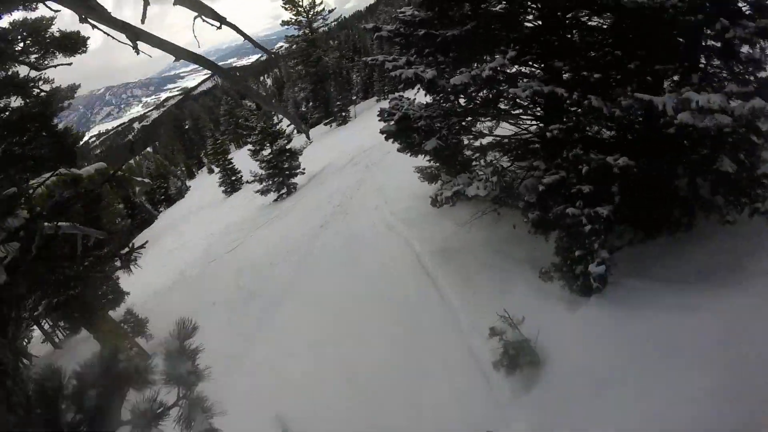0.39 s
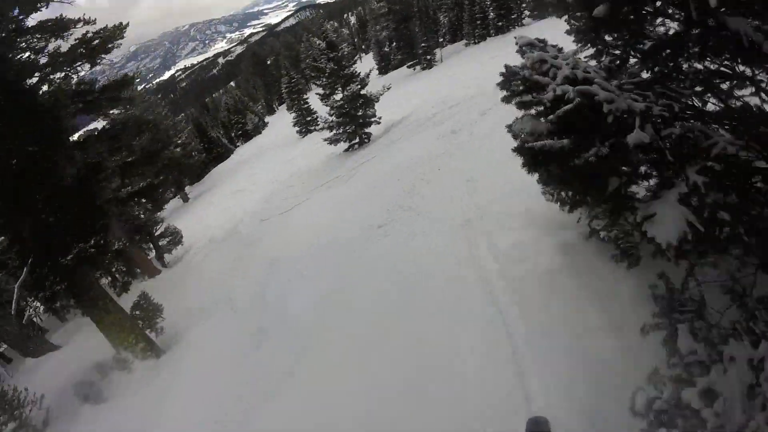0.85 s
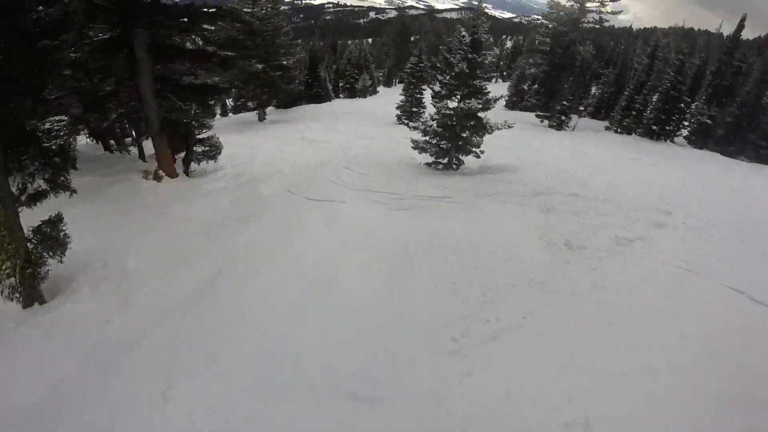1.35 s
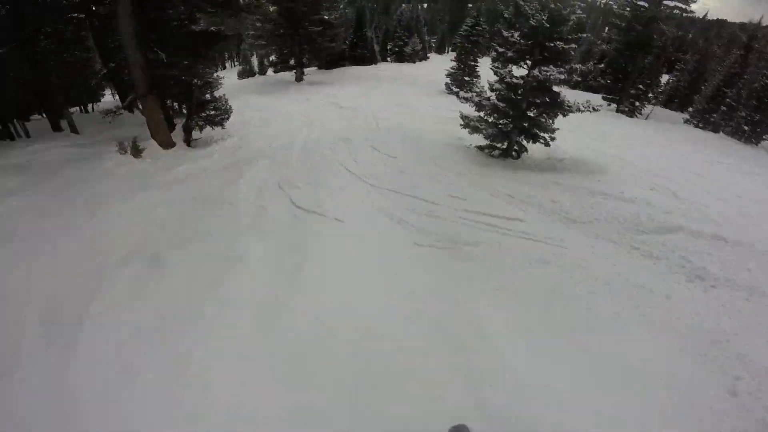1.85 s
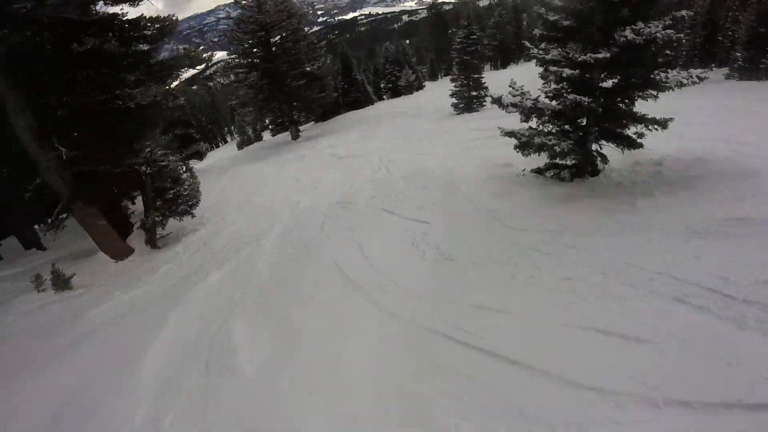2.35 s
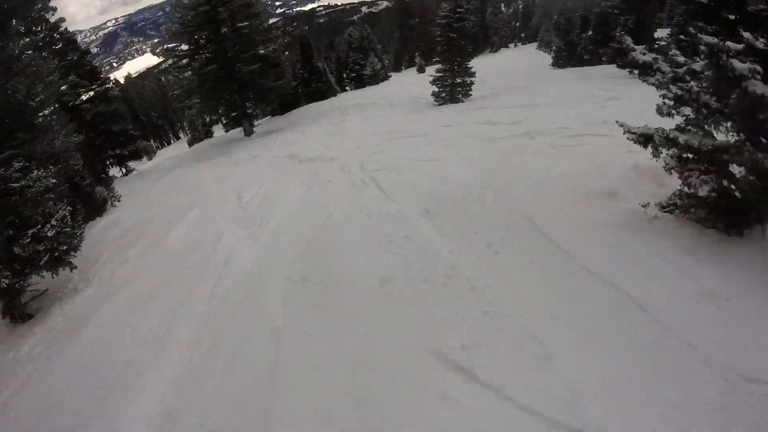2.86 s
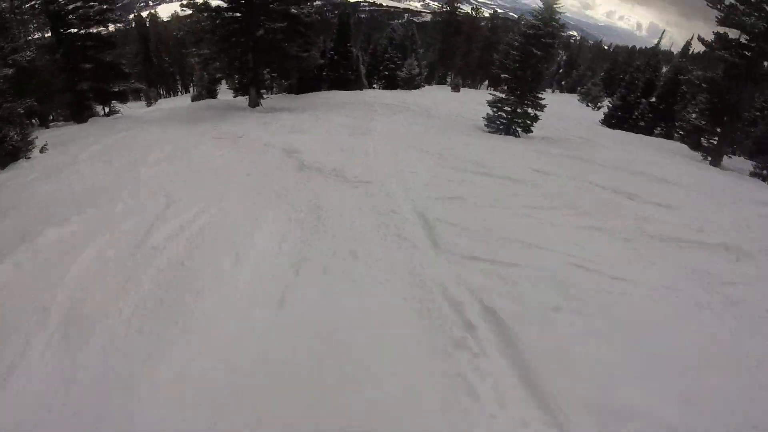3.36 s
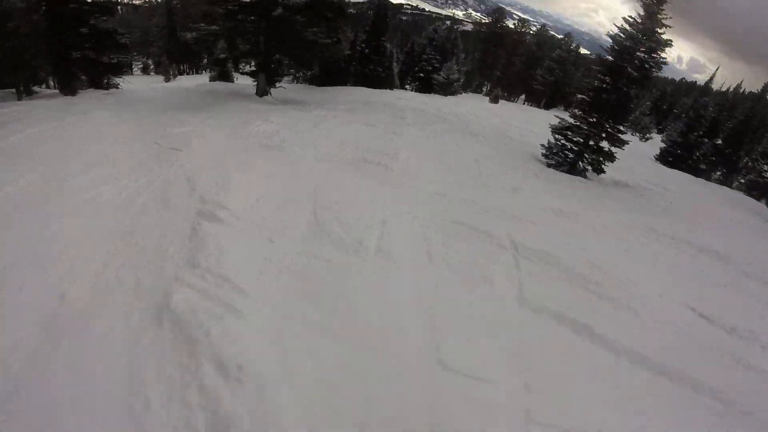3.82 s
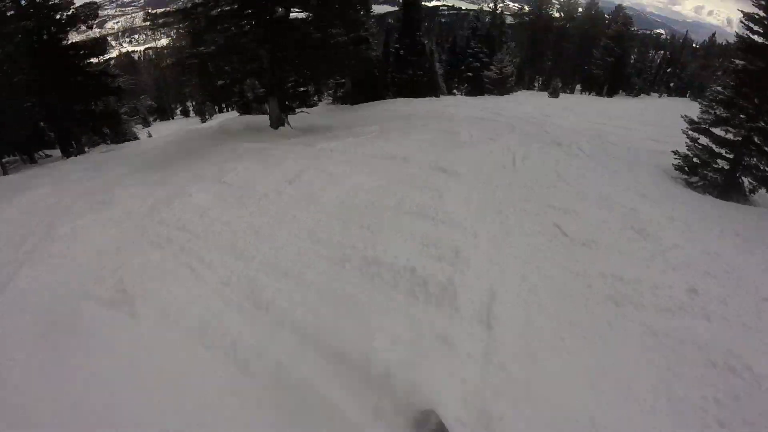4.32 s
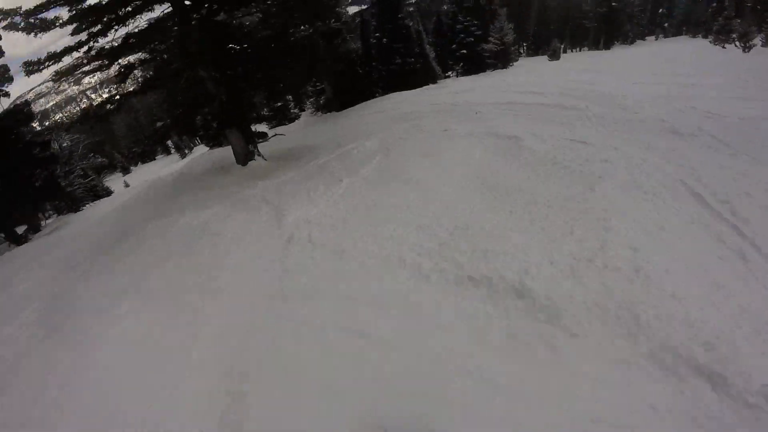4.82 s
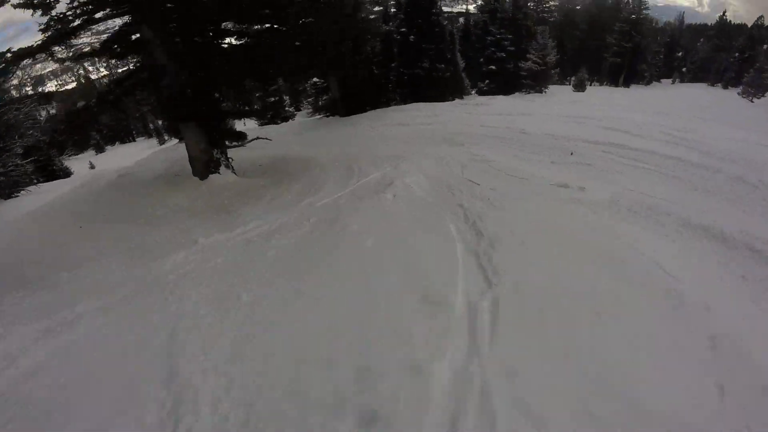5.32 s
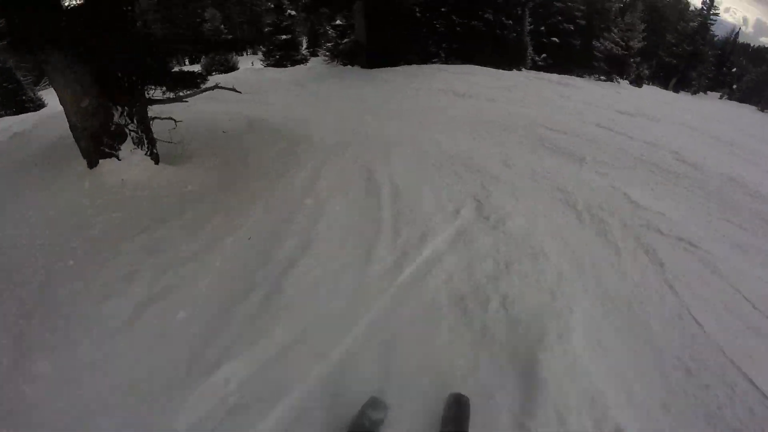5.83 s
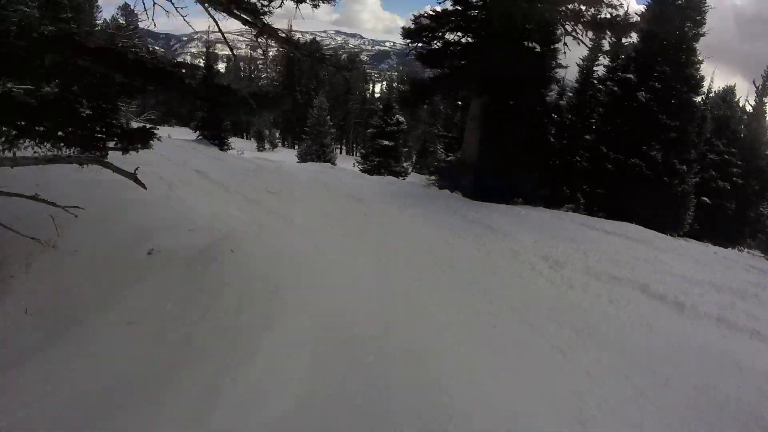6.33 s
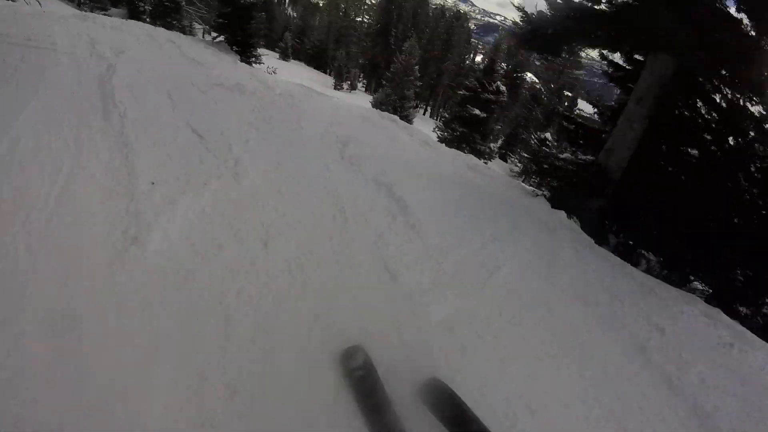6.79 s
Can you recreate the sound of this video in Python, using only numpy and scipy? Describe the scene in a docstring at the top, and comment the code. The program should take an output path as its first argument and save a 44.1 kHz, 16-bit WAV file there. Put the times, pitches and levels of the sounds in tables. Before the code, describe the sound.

Close, boxy sound inside a camera housing on an open snowy slope: first nearly quiet, soft brushing snow, then a rattle and rising coarse hiss as the skis carve and skid. Turns come as rough surges of scraping and fine spray over low wind buffeting. Dry plastic ticks become frequent, a low bump jolts the microphone midway, and the loudest bangs and rattles crowd the last half second.

```python
"""Snow hisses under the skis of a skier carving down a slope with a camera in a plastic housing.
The hiss is gritty noise ringing through the resonances of the housing. Wind throbs as noise through a
low resonance and rustles as bands of noise. Knocks are short fading tones, the loose mount ticks
as tiny clicks that ring the housing, and bumps in the slope jolt the camera as single slow swings.
"""
import sys
import numpy as np
from scipy import signal
from scipy.io import wavfile
from scipy.ndimage import uniform_filter1d

SR = 44100
rng = np.random.default_rng(int(sys.argv[2]) if len(sys.argv) > 2 else 0)


def waveform_to_disk(signal):
    """Save audio, clipped to [-1, 1], as 16-bit WAV at the path in sys.argv[1]."""
    frames = np.transpose(np.atleast_2d(signal))
    scaled = np.clip(frames, -1, 1) * 32767
    samples = np.round(scaled).astype(np.int16)
    wavfile.write(sys.argv[1], SR, samples)


def ratio_of_db(decibels):
    """Turn decibels (scalar or array-like) into linear amplitude factors; 0 dB maps to 1."""
    return 10 ** (np.asarray(decibels, float) / 20)


N = 305613      # length in samples


def rms_one(x):
    """Scale to rms 1."""
    return x / np.sqrt(np.mean(x ** 2) + 1e-20)


def in_time(rows):
    """Join the rows of a table by straight lines: each column becomes one value per sample."""
    s, *columns = np.transpose(rows)
    return [np.interp(np.arange(N) / SR, s, column) for column in columns]


def drift(rate_hz):
    """Slow random wandering of spread 1: noise at every 20th sample, smoothed by two low-passes."""
    r = np.exp(-2 * np.pi * rate_hz * 20 / SR)
    noise = rng.standard_normal(N // 20 + 3002)
    slow = signal.lfilter([1], [1, -2 * r, r * r], noise)[3000:]      # skip the settling
    return np.interp(np.arange(N) / 20, np.arange(len(slow)), rms_one(slow))


def ring(x, hz, width_hz):
    """A resonance: a unit click sets a fading sine ringing from height 1; a wider one fades sooner."""
    r, w = np.exp(-np.pi * width_hz / SR), 2 * np.pi * hz / SR
    return signal.lfilter([0, np.sin(w)], [1, -2 * r * np.cos(w), r * r], x + 1e-18)


def cut(x, hz, kind, order=2):
    """Butterworth filter."""
    return signal.sosfilt(signal.butter(order, hz, kind, fs=SR, output="sos"), x)


# gusts pressing on the housing: start_s, level_db
GUSTS = [(0.0, -42.5), (0.75, -45), (1.05, -40), (1.74, -38), (1.916, -22.5), (2.14, -50), (2.28, -33.5),
         (3.2, -36.5), (3.6, -29.5), (3.9, -35), (4.25, -31), (4.505, -15.5), (4.9, -27.5), (5.32, -36),
         (5.887, -23), (6.21, -36.5), (6.62, -17.5), (6.93, -18.5)]


def wind_throb():
    """Gusts swing the membrane near its lowest resonance, heard as a deep throb."""
    (level_db,) = in_time(GUSTS)
    swing = ring(rng.standard_normal(N), 27.3, 16)
    throb = cut(cut(swing, 19.4, "high"), 43.4, "low", order=6)
    # halve the chance swings in level (in dB), so that the gusts lead
    power = uniform_filter1d(throb ** 2, SR // 8)
    return ratio_of_db(level_db) * rms_one(throb / power ** 0.25)


# strength of the small eddies around each pitch, relative: pitch_hz, level_db (per Hz)
EDDIES = [(70, 1), (130, -3), (250, -7.5), (450, -13)]


def wind_rustle(buffet_db):
    """Small eddies buffet the housing: bands of noise that swell partly together, partly alone."""
    lumps, rustle = drift(4.0), 0
    for hz, level_db in EDDIES:
        band = cut(rng.standard_normal(N), [hz / 1.72, hz * 1.59], "band")
        rustle = rustle + band * ratio_of_db(level_db + 0.24 * lumps + 2.5 * drift(13.0))
    return ratio_of_db(buffet_db) * rms_one(rustle)


# how the skis ride: start_s, load_db (weight on the edges, as hiss level),
# skid_db (sideways slide), bite_db (grip of the edge, as brightness)
RIDE = [(0.0, -67.5, 3.2, -5), (1.6, -59.5, -2.1, -4), (1.69, -49, 0, -8), (1.836, -41, 4.5, -3.5),
        (2.01, -56, 3.5, -2), (2.2, -47, -10, -5), (2.28, -39.5, -3, 2), (2.509, -35, -3, 6),
        (2.549, -39, -4, -4), (3.2, -32, 1.5, 4), (3.63, -31, 5.5, -2), (3.69, -37, 5, -3),
        (3.9, -38.5, 3.5, -.6), (3.97, -34, -0.5, 1.1), (4.3, -32, 7, 0.5), (4.62, -37, 6.5, -1.5),
        (5.07, -32, -3, -1.5), (5.43, -29, 3.5, 3), (5.6, -33, 2.3, -1), (5.82, -33, 6, -2.5),
        (6.0, -40.5, 6.5, -3), (6.2, -36, -4, .1), (6.24, -33.5, 6, 2.5), (6.575, -29.5, 9.5, -1.7),
        (6.635, -25, 13, -0.5), (6.72, -36.5, 8, -4), (6.93, -41, 10, 5)]
# brief scuffs over rough patches: peak_s, half_length_s (nominal), rise_db (added to the load)
ROUGH_PATCHES = [(0.287, .08, 6.5), (0.567, 0.11, 13.5), (0.912, .04, 2), (1.046, 0.01, 7),
                 (1.224, 0.023, 2), (1.43, 0.034, 2), (1.693, 0.0096, 4), (1.798, 0.015, 3.5),
                 (4.24, 0.022, 2), (5.717, 0.15, 4.5)]


def skis():
    """Load and skid set the level of the hiss, scrape, spray and buffeting; scuffs leave the air alone."""
    load_db, skid_db, bite_db = in_time(RIDE)
    clock = np.arange(N) / SR
    swing_db = load_db + 40      # load above a reference of -40 dB
    buffet_db = -50 + 0.49 * swing_db + 0.24 * skid_db
    scuff_db = 0
    for s, half_s, rise_db in ROUGH_PATCHES:
        # full rise up to 0.48 of the half length, gone at 1.3 of it
        scuff_db = scuff_db + rise_db * np.interp(np.abs(clock - s) / half_s, [0.48, 1.3], [1, 0])
    hiss_db = load_db + scuff_db
    skid_db = skid_db + 0.14 * scuff_db
    swing_db = swing_db + scuff_db
    scrape_db = -51.5 + 0.55 * swing_db + 0.67 * skid_db
    spray_db = -62 + 0.82 * swing_db + 0.89 * skid_db + 0.42 * scuff_db
    mist_db = 0.2 * skid_db      # the finest spray grows with the skid
    return hiss_db, scrape_db, spray_db, bite_db, mist_db, buffet_db


# resonances (modes) of the housing, also used by ticks(): pitch_hz, width_hz,
# hiss_db (relative gain for snow), tick_db (gain for ticks)
MODES = [(391, 47, -5.5, -21.5), (589, 23.2, -2.5, -47), (1050, 135, -13.5, -18), (1430, 225, -1.5, -7),
         (1928, 244, 0, -3), (2238, 180, -1.5, -3.5), (2618, 460, -2.5, -3.5), (3170, 600, -35, 6),
         (4018, 376, -8, 1.5), (5635, 185, 10.5, -7), (6220, 360, 9, -8.5), (7900, 870, -6, 6),
         (9320, 1200, -7, -0.5), (11600, 2500, -48.5, -11)]


def snow(hiss_db, scrape_db, spray_db, bite_db, mist_db):
    """Crushed crystals make gritty noise that fills each resonance, all swelling together over ruts."""
    ruts_db, grit_db = 1.0 * drift(10.3), 1.54 * drift(133.0)
    parts = np.zeros((3, N))      # scrape, hiss, spray
    # pellets of ice strike the housing, about 14 a second
    ice = (rng.random(N) < 14 / SR) * rng.exponential(12.0, N)
    for hz, width_hz, level_db, _ in MODES:
        part = np.searchsorted([1700, 4600], hz)
        # lumps break under the edge, about 40 a second, heard in the scrape only
        crunch = (rng.random(N) < 40 / SR) * 20.0 * (part == 0)
        grains = rng.standard_normal(N) + crunch + ice * (hz > 7200)
        grains = grains * ratio_of_db(ruts_db + grit_db + 0.28 * drift(9.9))
        if hz < 700:      # a biting edge makes the lowest modes hum
            grains = grains * ratio_of_db(0.9 * bite_db)
        if hz > 4600:      # bite favours the modes below 7000 Hz, skid the finest spray
            tilt = np.clip(np.log2(7000 / hz) * 4, -1, 1)
            grains = grains * ratio_of_db(bite_db * tilt + mist_db * (hz > 7200))
        elif 1700 < hz < 4000:      # a clean carve favours the upper modes of the hiss
            tilt = np.clip(np.log2(hz / 2250) * 4, -0.8, 0.8)
            grains = grains * ratio_of_db(bite_db * tilt)
        parts[part] += ratio_of_db(level_db) * ring(grains, hz, width_hz) * width_hz / np.sqrt(SR)
    scrape, hiss, spray = (rms_one(p) for p in parts)
    scrape = cut(scrape, 3270, "low")
    hiss = cut(cut(hiss, 3434, "low", order=4), 1894, "high", order=3)
    spray = cut(cut(spray, 5600, "high", order=4), 10500, "low", order=3)
    return ratio_of_db(scrape_db) * scrape + ratio_of_db(hiss_db) * hiss + ratio_of_db(spray_db) * spray


# dull knocks on the housing, and a few crunches of snow under the skis (the rows at 950-1380 Hz): start_s,
# level_db, pitch_hz
BLOWS = [(0.855, -47, 420), (1.565, -46, 584), (1.944, -22.5, 121), (1.964, -25, 328), (1.885, -40, 590),
         (1.719, -42, 416), (2.255, -39, 577), (3.341, -31, 1050), (4.433, -25, 160), (4.44, -16.5, 310),
         (4.526, -16.5, 182), (5.617, -32.5, 950), (5.83, -26, 1380), (5.574, -31, 121), (5.75, -24.5, 134),
         (5.988, -33, 328), (6.545, -16, 119), (6.691, -6, 295), (6.694, -8, 123), (6.665, -7, 94),
         (6.741, -14, 92.5), (6.81, -15, 261), (6.875, -19, 112), (6.9151, -5, 288)]


def knocks():
    """A soft blow, or a crunch of snow, sets one mode of the housing ringing: a short sine with a quick fade."""
    out, t = np.zeros(N), np.arange(SR // 5) / SR
    for s, level_db, hz in BLOWS:
        t60 = 0.047 * (300 / hz) ** 0.043      # seconds to fade by 60 dB; higher modes slightly sooner
        onset = 1 - np.exp(-t / 0.000067)
        note = np.sin(2 * np.pi * hz * t) * ratio_of_db(level_db - 60 * t / t60) * onset
        i = round(s * SR)
        out[i:i + len(t)] -= note[:N - i]
    return out


# ticks of the loose mount: start_s, level_db, hardness (0-1)
MOUNT_TICKS = [(1.689, -39.5, 0.37), (1.967, -25, 0.42), (2.0394, -32.5, 0.53), (2.049, -25, 0.41),
               (2.087, -41, 0.45), (2.193, -32.5, 0.46), (2.1973, -30, 0.39), (2.2414, -34.5, 0.27),
               (3.488, -30.5, 0.37), (3.585, -33, 0.2), (3.627, -27.5, 0.34), (3.656, -34, 0.25),
               (4.0054, -20.5, 0.84), (4.011, -30, 0.38), (4.0811, -29.5, .25), (4.1467, -18.5, 0.6),
               (4.176, -29, 0.8), (4.4404, -16, 0.57), (4.5034, -25, 0.56), (4.5182, -31, 0.14),
               (4.5472, -27, 0.9), (4.584, -27, 0.77), (4.7025, -18, .48), (4.9162, -22, 0.47),
               (5.001, -33, 0.27), (5.0516, -25, 0.46), (5.1608, -24, 1), (5.372, -25.5, .95),
               (5.4411, -24, 0.43), (5.6576, -25.5, 0.26), (5.745, -18.5, .7), (5.907, -23.5, 0.66),
               (6.038, -29.5, 0.42), (6.044, -22.5, 0.62), (6.0763, -33, 0.12), (6.0818, -31, 0.36),
               (6.1128, -27.5, 0.59), (6.1614, -26.5, .4), (6.2348, -27.5, 0.34), (6.34, -26, 0.64),
               (6.553, -23.5, 0.65), (6.6466, -22.5, 0.5), (6.681, -22.5, 0.7), (6.73, -19, 0.64),
               (6.7438, -24, 1), (6.7562, -24, 0.66), (6.7989, -25, .9), (6.851, -26, 0.3),
               (6.8832, -20.5, 1), (6.9147, -25, 0.13)]
# padded slaps that reach mainly the lower modes: start_s, level_db
PADDED_SLAPS = [(1.8059, -25), (4.529, -17), (4.734, -22.5), (6.6, -26), (6.6632, -9), (6.692, -17.5),
                (6.749, -19), (6.872, -16.5)]
# thin snaps, a dull body with a bright edge and a hollow middle: start_s, level_db
THIN_SNAPS = [(1.753, -38.5), (1.8824, -33.5), (2.2547, -29.5), (2.706, -31), (3.15, -31.5), (3.432, -32),
              (4.512, -36), (4.665, -30.5), (4.6851, -28.5), (5.2462, -27.5), (5.567, -35), (5.721, -30),
              (5.877, -27), (6.3071, -28.5), (6.398, -28), (6.702, -26), (6.777, -35), (6.789, -36)]


def contacts():
    """Start of each contact and its strength in the dull, hard and top modes."""
    rows = []
    for s, db, hardness in MOUNT_TICKS:      # a harder tick has less of the dull modes
        rows.append((s, db - 30.5 * (hardness - 0.26), db, db - 14))
    for s, db in PADDED_SLAPS:
        rows.append((s, db, db - 59, db - 59))
    for s, db in THIN_SNAPS:
        rows.append((s, db, db - 18, db - 10.5))
    return np.array(rows)


def ticks():
    """Each contact is five quick bounces that strike every resonance with a strength of its own."""
    rows, out = contacts(), np.zeros(N)
    chance = rng.random((len(rows), 5))
    # bounces follow 0.4 to 2 ms apart; the first comes within 0.2 ms of the start
    lag_s = np.cumsum(0.0004 + 0.0016 * chance, axis=1) - 0.0004 - 0.0014 * chance[:, :1]
    at = np.minimum(((rows[:, :1] + lag_s) * SR).astype(int), N - 1)
    fade_db = -1500.0 * lag_s
    spread = rng.standard_normal((len(rows), len(MODES), 5))
    dull_db, hard_db, top_db = rows[:, 1:].T[:, :, None]
    for k, (hz, width_hz, _, level_db) in enumerate(MODES):
        hard = np.clip((hz - 2000) / 3500, 0, 1)      # 0 for a dull mode, 1 for a hard one
        band_db = top_db if hz > 7200 else dull_db + hard * (hard_db - dull_db)
        strength = ratio_of_db(band_db + level_db + fade_db + 1.54 * spread[:, k])
        clicks = np.zeros(N)
        np.add.at(clicks, at, strength * np.sign(spread[:, k - 1]))      # push or pull by chance
        out += cut(ring(clicks, hz, 0.94 * width_hz), min(1.59 * hz, 15000), "low")
    return out


# bumps that jolt the camera: trough_s (deepest point), level_db, pitch_hz (of the swing down)
BUMPS = [(1.92, -28, 33.5), (4.303, -14.5, 35.6), (4.409, -10, 35.7), (4.53, 0.5, 49.2),
         (5.898, -18.5, 33.6), (6.671, -1.5, 50), (6.737, -3.5, 36), (6.762, -7, 44), (6.878, -4.5, 50)]


def jolts():
    """One swing of pressure: up, deeper down to a sharp stop, and a slower small return."""
    out, clock = np.zeros(N), np.arange(N) / SR
    for s, level_db, hz in BUMPS:
        cycles = (clock - s) * hz
        cycles = np.where(cycles > 0, 0.75 * cycles, cycles)      # slower after the trough
        reach = np.where(cycles > 0, 0.45, 0.8)
        swing = np.cos(2 * np.pi * cycles) * np.exp(-(cycles / reach) ** 2) * (cycles > -0.75)
        stop = 0.68 * np.exp(-np.abs(cycles) / 0.12)
        out -= ratio_of_db(level_db) * (0.71 * swing + stop)
    return out


def scene():
    """All sources meet at one microphone."""
    *snow_db, buffet_db = skis()
    wind = wind_throb() + wind_rustle(buffet_db)
    mix = wind + snow(*snow_db) + knocks() + ticks() + jolts()
    return mix[None]      # one channel


def roll_off(x):
    """The treble ends steeply here."""
    return signal.sosfilt(signal.butter(12, 15820, fs=SR, output="sos"), x)


def record(dry):
    """The preamplifier hisses faintly and rounds the highest peaks."""
    hiss = cut(rng.standard_normal(N), 3600, "low", order=1)
    hiss = ratio_of_db(-64.5) * rms_one(cut(hiss, 9600, "low"))
    heard = 1.2 * np.tanh((dry + hiss) / 1.2)
    return roll_off(heard)


dry = scene()
out = record(dry)
waveform_to_disk(out)
```